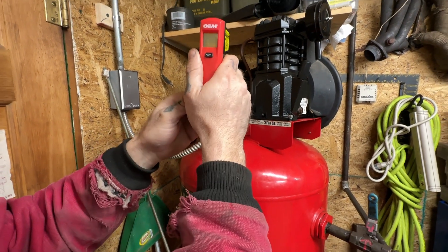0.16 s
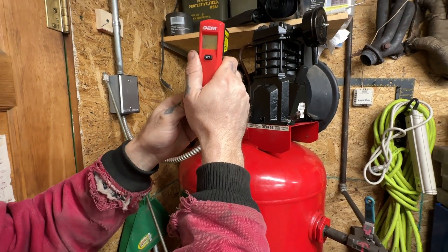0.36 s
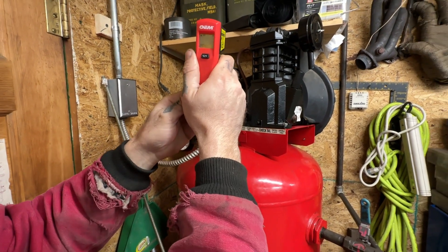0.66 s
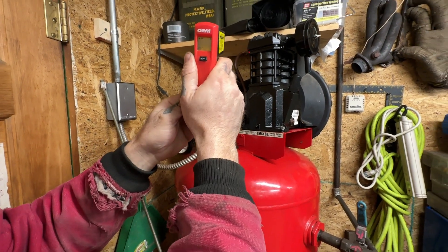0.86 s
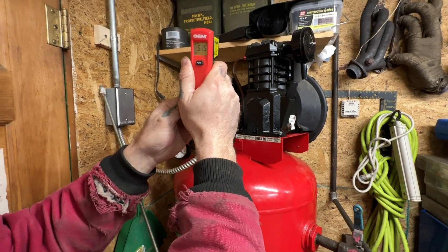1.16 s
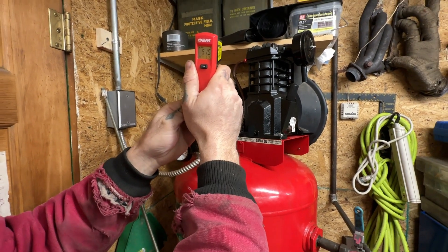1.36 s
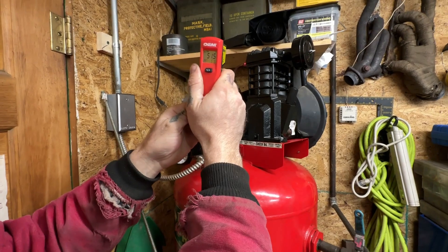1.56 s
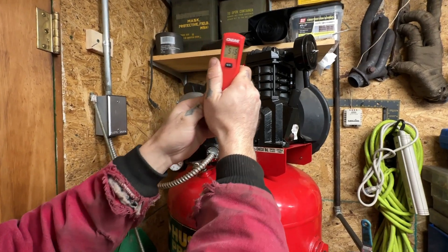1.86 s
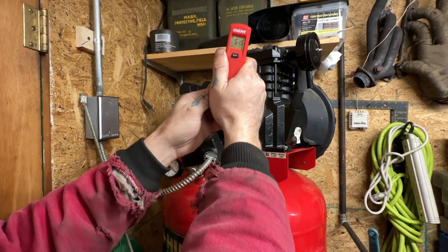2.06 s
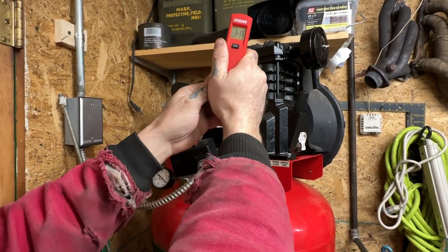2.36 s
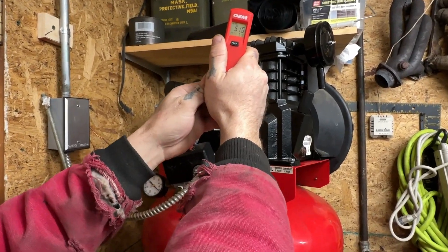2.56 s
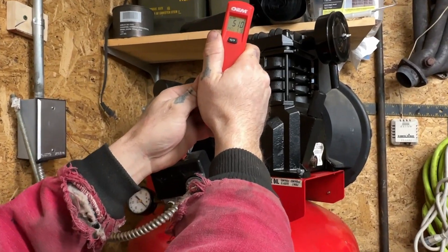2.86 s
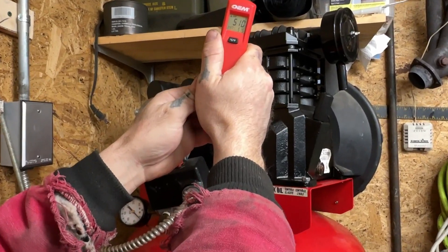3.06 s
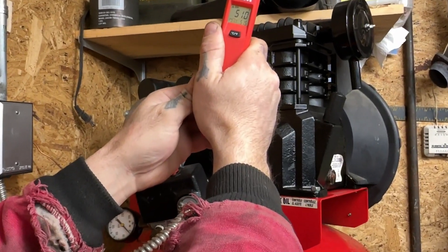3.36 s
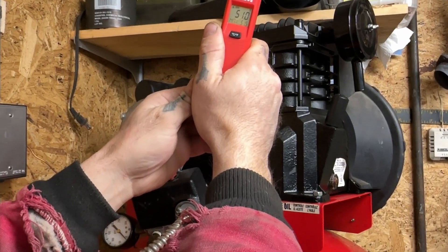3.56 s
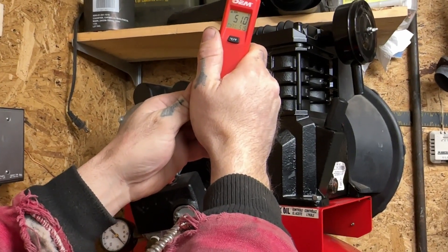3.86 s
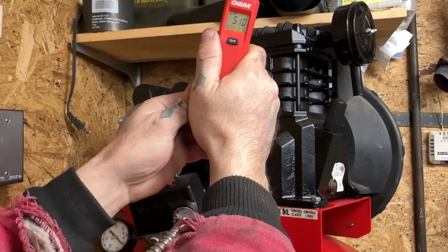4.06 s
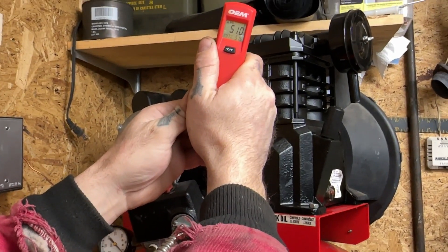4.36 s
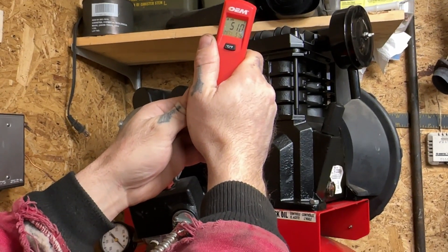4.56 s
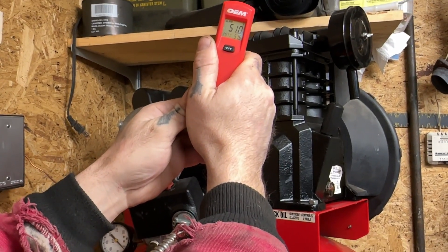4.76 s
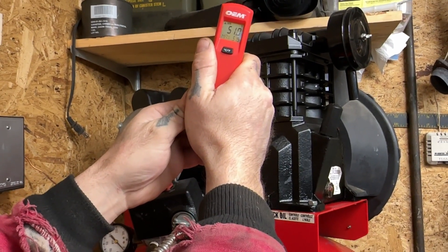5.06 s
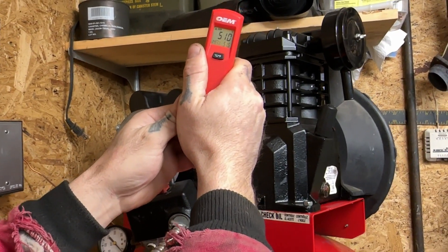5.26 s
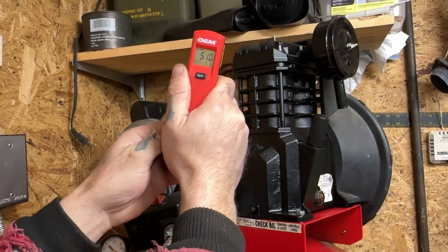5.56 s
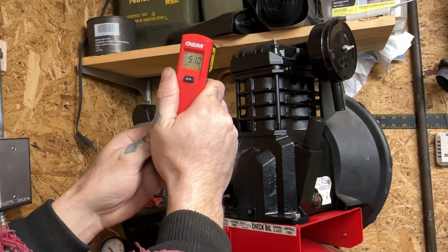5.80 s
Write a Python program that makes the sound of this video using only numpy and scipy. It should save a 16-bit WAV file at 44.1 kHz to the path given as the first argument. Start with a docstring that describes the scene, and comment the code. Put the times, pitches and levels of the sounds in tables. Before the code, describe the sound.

In a small wooden workshop, a twin-cylinder air compressor runs about an arm's length from the microphone. Its fast throbbing drone, valve knocks and hissing air start loud, fall away between about half a second and just over one second, then continue low and steady. The microphone moves closer with little change except slightly different hiss colour. Near five seconds the level drops abruptly to a faint hum.

```python
"""Piston air compressor in a small workshop

A twin-cylinder compressor fills its tank about an arm's length from the microphone, which later moves in.
Crank harmonics make the throb and drone, struck filters the valve knocks, coloured noise the hissing air
and the shaken tank, and sines the motor hum and whine; brief rasps are noise in narrow bands.
The sound falls away to a low level after half a second and later drops abruptly to a faint hum."""
import sys
import numpy as np
from scipy import signal
from scipy.fft import rfft, irfft, next_fast_len
from scipy.io import wavfile
from scipy.ndimage import uniform_filter1d

SR = 44100
rng = np.random.default_rng(int(sys.argv[2]) if len(sys.argv) > 2 else 0)


def master_out(mix):
    """Clip the mix to full scale and print it as 16-bit PCM to the path in sys.argv[1]."""
    frames = np.transpose(np.atleast_2d(mix))
    ceiling = np.clip(frames, -1, 1)
    pcm = np.round(ceiling * 32767).astype(np.int16)
    wavfile.write(sys.argv[1], SR, pcm)


N = 261557

CRANK_HZ = 16.9396
FIRST_STROKE = .051  # crank position at the start (turns)
# abrupt drop of the level: moment (s), depth (dB)
DROP_S, DROP_DB = 5.106, -15.6
# after the drop the thump's harmonics drift out of step: spread (rad), rate (per s)
BLUR_RAD, BLUR_RATE = 1.3, 40
# power of the share still to go: above 1, a fade is steepest at its start
FADE_BEND = 1.3
# the microphone moves in once: when (s), for how long (s), closeness before and after (0-1)
MOVE_S, MOVE_LASTS_S, CLOSE_BEFORE, CLOSE_AFTER = 1.7, .65, .09, 0.66
# change of the hiss at full closeness (dB)
CLOSE_HISS_DB = -2.0
# thin high sizzle: held from and until (s), level against the hiss (dB)
SIZZLE_FROM_S, SIZZLE_UNTIL_S, SIZZLE_DB = 1.05, 1.73, -8.5
SIZZLE_RISE_DB_PER_S, SIZZLE_FALL_DB_PER_S = 48, 28


def undb(db):
    """Decibels to gain."""
    return 10 ** (np.asarray(db) / 20)


def unit(x):
    """Scale to rms 1."""
    return x / np.sqrt(np.mean(x ** 2))


def walk(rate):
    """Slow chance with rms 1, from smoothed random steps at a rate per second."""
    k = int(SR / rate)
    steps = np.repeat(rng.standard_normal(N // k + 1), k)
    smooth = uniform_filter1d(uniform_filter1d(steps, k), k)
    return unit(smooth[:N])


def colour(x, points, peaks=()):
    """Filter by a (Hz, dB) outline with resonances lifted out of it; causal, so they ring after each push."""
    size = next_fast_len(N + SR // 4) * 2
    hz = np.maximum(np.arange(size // 2 + 1) * SR / size, 1)
    at, db = np.transpose(points)
    db = np.interp(np.log(hz), np.log(at), db)
    for centre, width, lift in peaks:
        db = db + lift / (1 + (2 * (hz - centre) / width) ** 2)
    # folding the cepstrum forward gives the minimum-phase filter
    cepstrum = irfft(np.log(undb(db)))
    cepstrum[1:size // 2] *= 2
    cepstrum[size // 2 + 1:] = 0
    response = np.exp(rfft(cepstrum))
    return unit(irfft(rfft(x, size) * response)[:N])


def narrow_noise(hz, width_hz):
    """Noise of rms 1 in one narrow band."""
    edges = [hz - width_hz / 2, hz + width_hz / 2]
    band = signal.butter(2, edges, "bandpass", fs=SR, output="sos")
    return unit(signal.sosfilt(band, rng.standard_normal(N)))


def fade(loud_db, sag_db_per_s, start_s, lasts_s, quiet_db):
    """Level in dB of a layer that sags, fades and then holds."""
    t = np.arange(N) / SR
    to_go = np.clip(1 - (t - start_s) / lasts_s, 0, 1)
    return quiet_db + (loud_db - sag_db_per_s * t - quiet_db) * to_go ** FADE_BEND


def swell(middle_s, half_s, db):
    """Gain of one bell-shaped swell, down to 1/e at its half length."""
    t = np.arange(N) / SR
    return undb(db) * np.exp(-((t - middle_s) / half_s) ** 2)


def closeness():
    """The microphone moves in at an even pace and stays there (0 further off, 1 close by)."""
    moved = np.clip((np.arange(N) / SR - MOVE_S) / MOVE_LASTS_S, 0, 1)
    return np.clip(CLOSE_BEFORE + (CLOSE_AFTER - CLOSE_BEFORE) * moved, 0, 1)


def workshop(x, t60, wet_db):
    """Direct sound plus a dense, short wash from wooden walls and shelves."""
    t = np.arange(SR // 3) / SR
    tail = rng.standard_normal(len(t)) * undb(-60 * t / t60)
    wash = signal.fftconvolve(x, tail / np.linalg.norm(tail))[:N]
    return unit(x + undb(wet_db) * wash)


def chirrs():
    """Narrow bands of rasp that swell and die away quickly."""
    # faint brief chirrs: (middle [s], half length [s], centre [Hz], width [Hz], level [dB])
    rasps = [(0.846, .07, 3120, 350, -48), (0.973, .05, 4580, 500, -49.5), (1.12, 0.048, 3360, 400, -55),
             (2.16, 0.072, 1440, 90, -57), (2.343, .05, 1406, 90, -56), (2.62, .04, 1510, 140, -56),
             (2.83, .07, 14250, 400, -66), (3.1, .2, 13800, 400, -66)]
    out = 0
    for middle_s, half_s, hz, width_hz, db in rasps:
        out = out + swell(middle_s, half_s, db) * narrow_noise(hz, width_hz)
    return out


def tones(turn, wobble_rad=0.76, waver_db=0.6):
    """Steady motor hum, and a whine whose pitch wobbles once a turn under the changing load."""
    # motor shaft and magnetic hum: (frequency [Hz], relative level [dB])
    motor_lines = [(58.7, -14.5), (92.9, -20), (119.9, -11.5), (359.9, -12.5), (479.9, -15.5), (575.9, -24),
                   (719.8, -25)]
    # tones that the running pump keeps ringing: (frequency [Hz], relative level [dB])
    whine_lines = [(1304.3, -18.5), (1938, -30.5), (1997, -39), (2304, -33), (2590, -35), (2627, -32)]
    t = np.arange(N) / SR
    sway = wobble_rad * np.sin(2 * np.pi * turn)
    hum = whine = 0
    for hz, db in motor_lines:
        hum = hum + undb(db + waver_db * walk(5.35)) * np.sin(2 * np.pi * (hz * t + rng.random()))
    for hz, db in whine_lines:
        wave = np.sin(2 * np.pi * (hz * t + rng.random()) + sway)
        whine = whine + undb(db + waver_db * walk(4.95)) * wave
    return undb(-1.7) * hum + undb(-1.5) * whine


def tank(flicker_db=1.0):
    """Irregular shaking of the pump drones in the steel tank."""
    # outline of tank drone and shaking: (frequency [Hz], relative level per Hz [dB])
    tank_outline = [(20, -2), (60, -6.5), (115, -4), (150, -10.5), (230, -5.5), (310, -4), (430, 0.5),
                    (500, -4.5), (570, 0), (650, -3.5), (760, -12), (1100, -10.5), (1450, -14), (1900, -26)]
    shake = rng.standard_normal(N) * undb(flicker_db * walk(20))
    return undb(9) * colour(shake, tank_outline, [(421.5, 37, 6.2)])


def ring(turn, hz=640, width_hz=35):
    """A narrow tank resonance, driven both by the nearest crank harmonic and by random shaking."""
    # course of the ringing: (loud [dB], sag [dB/s], fade starts [s], fade lasts [s], quiet [dB])
    ring_fade = (-40.5, 4, 0.58, 0.14, -59)
    # the resonance swells and ebbs: (middle [s], half length [s], level [dB])
    ring_swells = [(.13, .06, -41), (.32, 0.056, -37), (0.593, 0.084, -38.5), (.93, 0.027, -51),
                   (1.43, 0.079, -50)]
    shaken = narrow_noise(hz, width_hz)
    driven = np.sin(2 * np.pi * np.round(hz / CRANK_HZ) * turn)
    gain = undb(fade(*ring_fade)) + sum(swell(*row) for row in ring_swells)
    return unit(shaken + driven) * gain


def knocks(turn, scatter_db=0.5):
    """Each valve opens with a dull knock that repeats almost exactly: an impulse through one outline."""
    # outline of the valve knock: (frequency [Hz], relative level per Hz [dB])
    knock_outline = [(500, -40), (700, 1.5), (820, 3.5), (930, -19.5), (1100, 0.5), (1400, -22.5),
                     (2200, -22), (3600, -16), (6000, -18), (12000, -36)]
    starts = np.flatnonzero(np.diff(np.floor(2 * turn)))  # two strokes a turn
    hits = np.zeros(N)
    hits[starts] = undb(scatter_db * rng.standard_normal(len(starts)))
    return undb(-2.5) * workshop(colour(hits, knock_outline), t60=0.063, wet_db=-6)


def cylinder(turn, head, swell_db=6, hump_db=1.0, crest=0.2):
    """Air rushes hardest once a turn, near mid stroke, and rings in the cylinder's passages."""
    # outline of air through the valves: (frequency [Hz], relative level per Hz [dB])
    air_outline = [(800, -38), (1500, -6.5), (2000, -9), (2400, -12.5), (2800, -7.5), (3260, -2.5),
                   (4300, -4), (5900, -6.5), (8600, -0.5), (10100, -10.5), (13000, -19), (14200, -14.5),
                   (15700, -21)]
    angle = 2 * np.pi * (turn - crest)
    flow_db = swell_db * np.cos(angle) + hump_db * np.cos(2 * angle)
    rush = rng.standard_normal(N) * undb(flow_db)
    far = colour(rush, air_outline, [(hz, width, db) for hz, width, db, _ in head])
    near = colour(rush, air_outline, [(hz, width, db) for hz, width, _, db in head])
    close = closeness()
    return workshop((1 - close) * far + close * near, t60=0.067, wet_db=-4.5)


def sizzle_gain():
    """The sizzle rises, holds and dies away."""
    t = np.arange(N) / SR
    early = np.maximum(SIZZLE_FROM_S - t, 0)
    late = np.maximum(t - SIZZLE_UNTIL_S, 0)
    return undb(SIZZLE_DB - SIZZLE_RISE_DB_PER_S * early - SIZZLE_FALL_DB_PER_S * late)


def air(turn, pulse_db=2.0, spit_db=7):
    """The two cylinders hiss in turn, each with its own colour; a top spray and a thin sizzle pulse along."""
    # narrow resonances of each cylinder's air path:
    # (centre [Hz], width [Hz], lift from further off [dB], lift from close by [dB])
    first_head = [(1329, 79, 21.5, 12), (3270, 420, 5, -0.5), (3590, 35, 0, 10), (4290, 290, 6.5, 5.5),
                  (5610, 70, 5, 11.5), (6280, 140, 11.5, 6), (6850, 250, 8, 4), (7140, 62, 6, 16),
                  (8210, 114, 11.5, 7), (9330, 110, 11.5, 4), (11600, 110, 1, 16), (11960, 280, 6, 2),
                  (14220, 120, 2, 11)]
    second_head = [(2603, 120, 13.1, 7.2), (4030, 68, 3.2, 2), (4560, 220, 6.7, 2.6), (8353, 82, 13.3, 6.1),
                   (8640, 75, 7.9, 2), (8800, 350, 1.6, 7.7), (10400, 200, 1, 4.3), (13710, 90, 1, 9),
                   (13920, 130, 6.3, 2), (14400, 180, 5, 4)]
    first = cylinder(turn, first_head) * undb(-3.5)
    second = cylinder(turn + .5, second_head) * undb(-3.0)
    flow = np.sin(4 * np.pi * (turn - .06))  # twice a turn
    spray_outline = [(9000, -30), (11000, -7), (14500, -3), (15700, -8)]
    spray_noise = rng.standard_normal(N) * undb(spit_db * flow)
    spray = colour(spray_noise, spray_outline, [(11600, 80, 17), (13710, 90, 14)])
    sizzle_outline = [(9000, -53), (10400, -11), (10850, -3), (11150, -14), (11700, -14), (12800, -50)]
    sizzle = colour(rng.standard_normal(N) * undb(pulse_db * flow), sizzle_outline)
    return first + second + undb(-16.5) * spray + sizzle_gain() * sizzle


def reed(turn, open_share=.85):
    """Reed valves take turns, each swinging at its own pitch while its piston draws air, afresh every stroke."""
    # flutter of the two reeds: (first cylinder [Hz], second cylinder [Hz])
    reeds_hz = (328, 322)
    stroke = 2 * turn % 1
    flutter_hz = np.where(turn % 1 < .5, *reeds_hz)
    return -np.sin(2 * np.pi * flutter_hz * stroke / (2 * CRANK_HZ)) * (stroke < open_share)


def pulsation(turn, drone_db, thump_db, blur, split_hz=320, waver_db=0.46):
    """Crank harmonics, phased like the fluttering reeds; the lower, the more they follow the piston thump."""
    # pressure pulsation: (multiple of the crank rate, relative level [dB])
    harmonics = [(1, -11.5), (2, -3.5), (4, -5.5), (6, -12.5), (8, -19), (10, -20), (12, -13.5), (14, -9),
                 (16, -14), (17, -16), (18, 0.5), (19, -6.5), (20, 1), (21, -15.5), (22, -8.5), (23, -32),
                 (24, -17), (25, -21.5), (26, -27), (31, -26.5), (33, -25), (34, -28), (35, -23.5),
                 (37, -30), (38, -20), (39, -30), (40, -23.5)]
    one_turn = np.linspace(0, 1, SR // 10, endpoint=False)
    timing = np.angle(rfft(reed(one_turn)))
    out = 0
    for order, db in harmonics:
        # 1 at twice the crank rate, 0 from the split upward
        low = max(np.log(split_hz / (order * CRANK_HZ)) / np.log(split_hz / (2 * CRANK_HZ)), 0)
        course_db = low * (thump_db + 3.8) + (1 - low) * (drone_db - .9)
        level_db = db + course_db + waver_db * walk(9)
        phase = timing[int(order)] + low * blur * walk(BLUR_RATE)
        out = out + undb(level_db) * np.cos(2 * np.pi * order * turn + phase)
    return out


def scene():
    """Pulsation, knocks, air, whine and ring follow one crank, whose speed wavers very slightly."""
    # courses of the layers, before their own trims:
    # (loud [dB], sag [dB/s], fade starts [s], fade lasts [s], quiet [dB])
    drone_fade = (-18.0, 1.8, 0.5934, .63, -38.6)
    thump_fade = (-27.3, 21, .57, .28, -45)
    metal_fade = (-36, 17.5, 0.62, 0.53, -57)
    hiss_fade = (-27.1, 1, 0.577, 0.7, -48)
    motor_fade = (-18.7, 3, 0.6, 0.44, -38)
    t = np.arange(N) / SR
    turn = CRANK_HZ * t + FIRST_STROKE + 0.00045 * walk(11)
    dropped = uniform_filter1d(1. * (t > DROP_S), size=64)
    pump = pulsation(turn, fade(*drone_fade), fade(*thump_fade), BLUR_RAD * dropped)
    hum = pump + tones(turn) * undb(fade(*motor_fade))
    rattle = (knocks(turn) + tank()) * undb(fade(*metal_fade))
    hiss_db = fade(*hiss_fade) + CLOSE_HISS_DB * closeness()
    machine = hum + rattle + ring(turn) + air(turn) * undb(hiss_db) + chirrs()
    return (machine * undb(dropped * DROP_DB))[None]


def record(dry):
    """The top is cut steeply above 15750 Hz."""
    return signal.sosfilt(signal.ellip(10, .2, 80, 15750, fs=SR, output="sos"), dry)


dry = scene()
out = record(dry)
master_out(out)
```